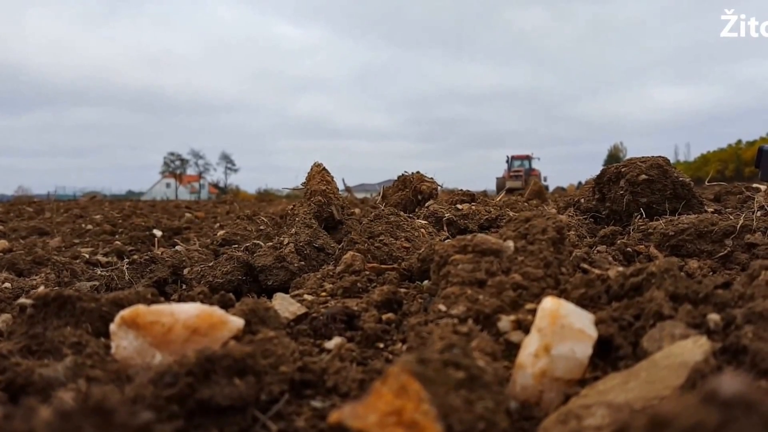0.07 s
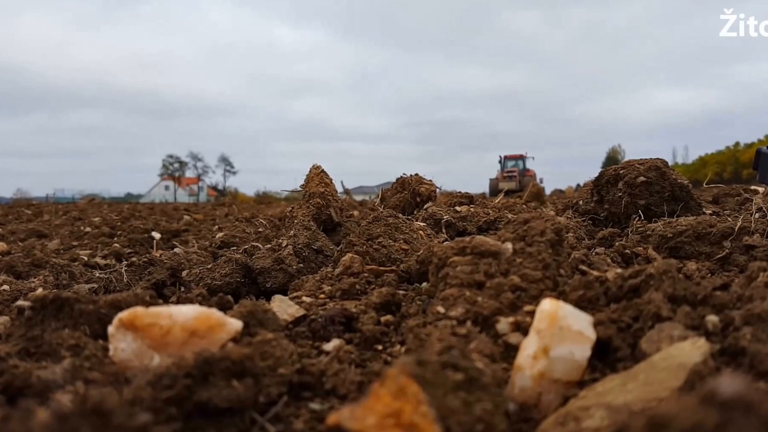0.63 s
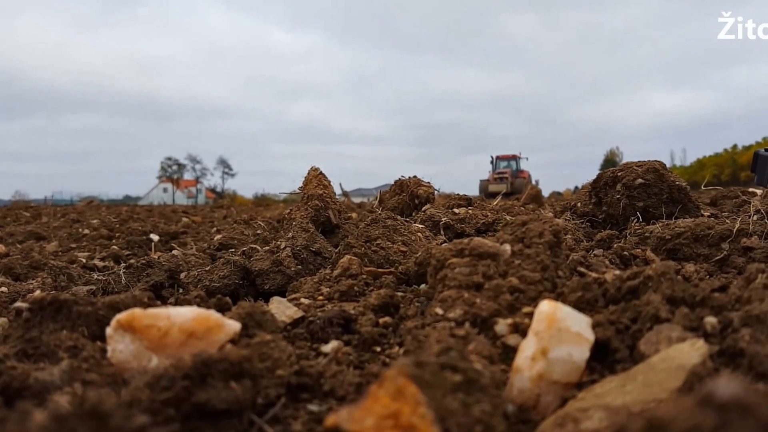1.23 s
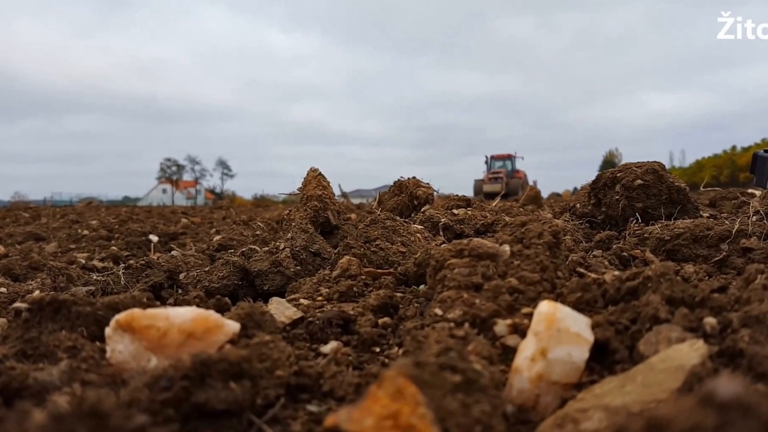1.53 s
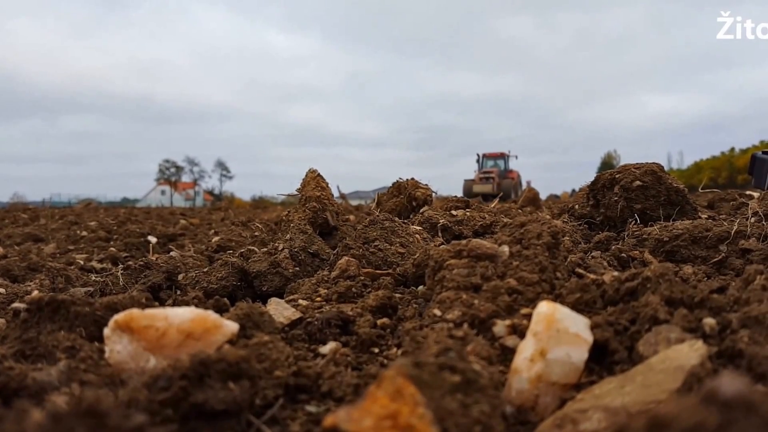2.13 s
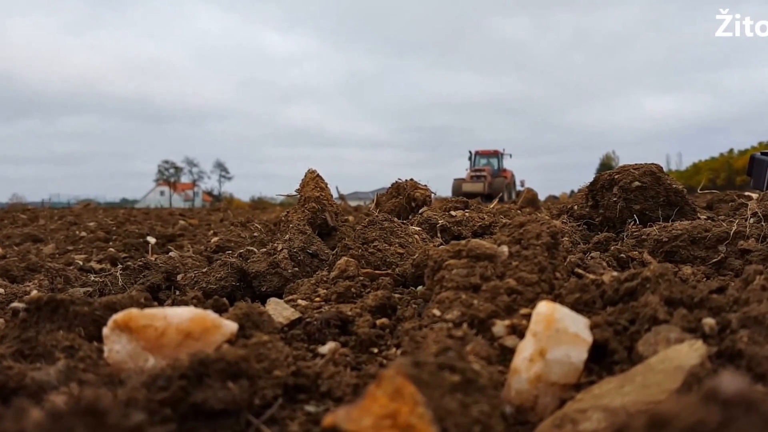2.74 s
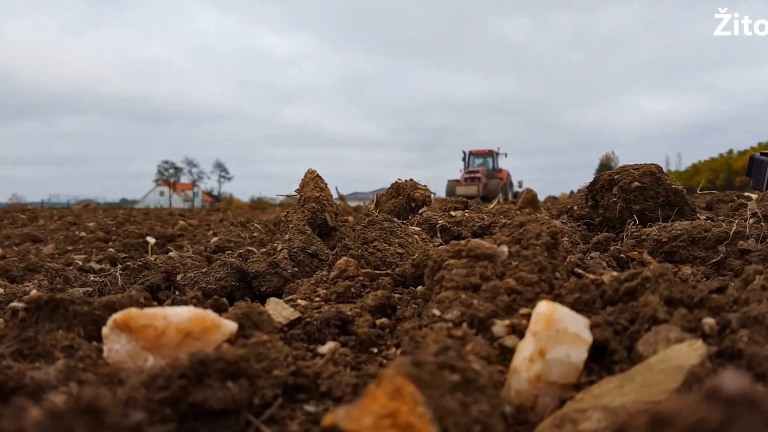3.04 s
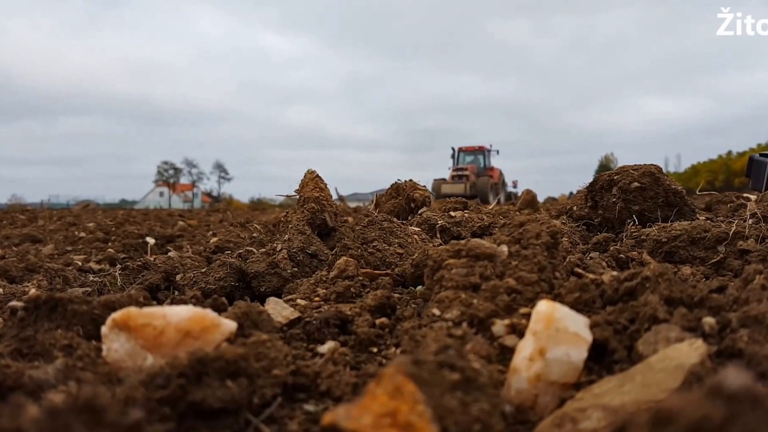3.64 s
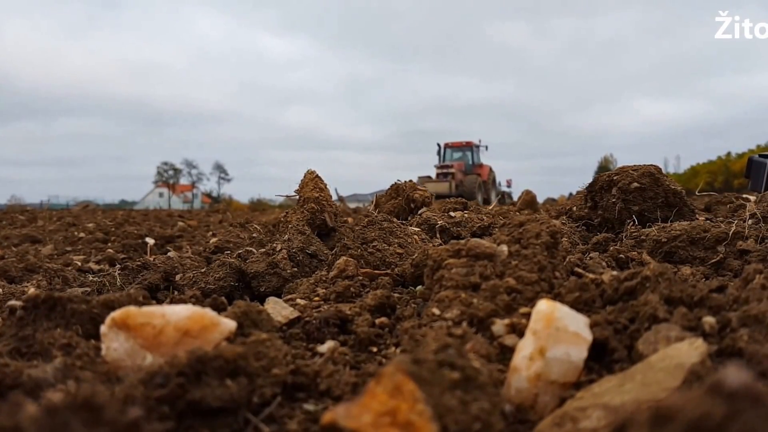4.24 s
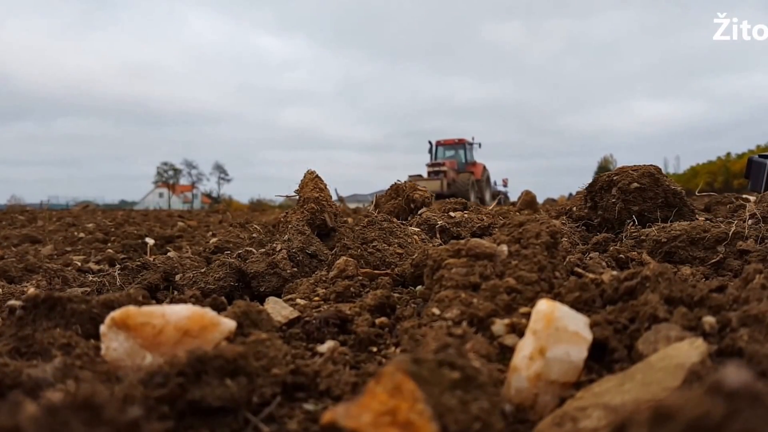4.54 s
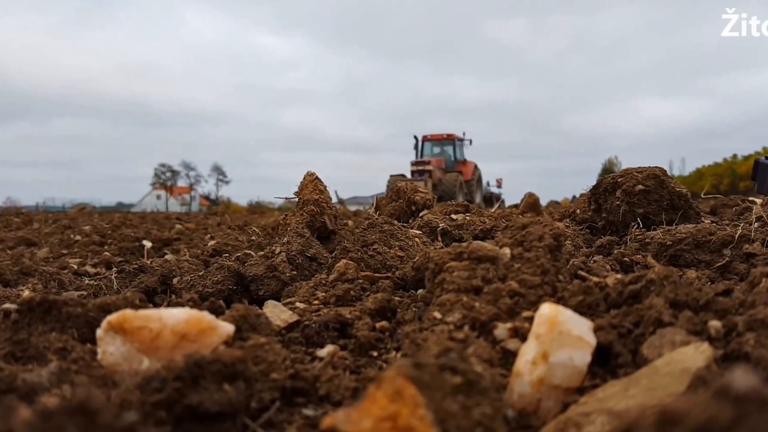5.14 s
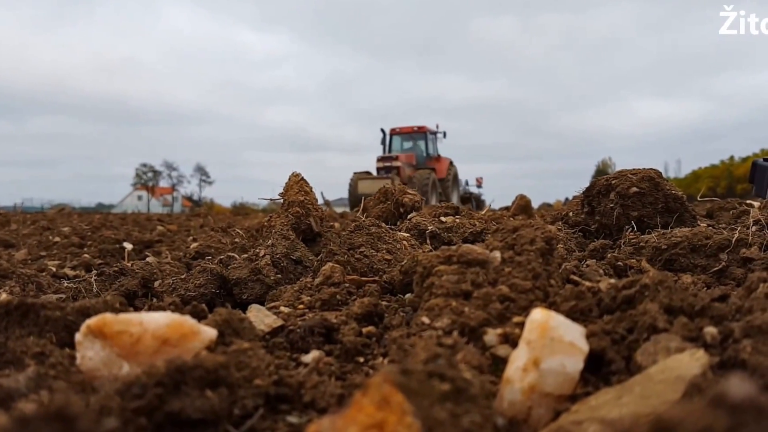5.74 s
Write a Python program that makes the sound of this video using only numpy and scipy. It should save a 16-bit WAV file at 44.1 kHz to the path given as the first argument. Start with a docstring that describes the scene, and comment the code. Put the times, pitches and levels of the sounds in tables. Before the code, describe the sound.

A diesel tractor drags a disc harrow toward a microphone lying in an open field. From the start the exhaust drones low and the engine knocks, its pitch sagging slightly again and again under load. Beneath it, steel discs rattle, ring and hiss through soil, and a faint whine fades away. Around 1.6 seconds gravel ticks, and a few stones click until about 2.1 seconds. From 2.2 to 4.7 seconds the discs give faint, brief, high squeaks. Between 2.6 and 5.6 seconds the sound turns thin and hollow in spells, the longest from about 3.7 to 4.5 seconds. Wind gusts rumble on the microphone from about 1 second on, growing stronger. The tractor gets steadily louder throughout, and by 6 seconds it is near and growling, with hard wind buffeting.

```python
"""A six-cylinder diesel tractor drags a disc harrow toward a phone lying on a field. From the start the
exhaust drones, the block knocks every cycle, the speed sags with the load and steel discs ring and rush
through soil; a faint whine fades. Around 1.6 s gravel ticks and stones begin to click; from 2.2 to 4.7 s
the discs squeak. From 2.6 to 5.6 s the sound turns thin and hollow in spells. By the end the engine is
near and growling, and gusts buffet the microphone harder."""
import sys
import numpy as np
from scipy import signal
from scipy.fft import rfft, irfft
from scipy.io import wavfile
from scipy.ndimage import uniform_filter1d, map_coordinates

SR = 44100
rng = np.random.default_rng(int(sys.argv[2]) if len(sys.argv) > 2 else 0)


def unload_wav(signal):
    """Save mono or channel-first audio to the path in sys.argv[1] as 16-bit WAV at rate SR, clipped to [-1, 1]."""
    wavfile.write(
        sys.argv[1],
        SR,
        np.round(np.clip(np.atleast_2d(signal).T, -1, 1) * 32767).astype(np.int16),
    )


N = 259749
T = np.arange(N) / SR
BINS_HZ = np.maximum(np.fft.rfftfreq(N, 1 / SR), 1)


def undb(db):
    """Decibels to gain."""
    return 10 ** (np.asarray(db) / 20)


def unit(x):
    """Scale to rms 1."""
    return x / np.sqrt(np.mean(x ** 2))


def colour(points):
    """Gain per bin from (frequency [Hz], level [dB]); -48 dB/octave beyond the ends."""
    hz, db = np.transpose(points)
    outside_oct = np.abs(np.log2(BINS_HZ / np.clip(BINS_HZ, hz[0], hz[-1])))
    return undb(np.interp(np.log(BINS_HZ), np.log(hz), db) - 48 * outside_oct)


def bell(hz, sigma_oct):
    """Gain per bin of a resonance, Gaussian in log frequency."""
    return np.exp(-.5 * (np.log2(BINS_HZ / hz) / sigma_oct) ** 2)


def shape(x, gain):
    """Filter by a gain per bin."""
    return irfft(rfft(x) * gain, N)


def noise(gain):
    """Filtered noise, rms 1."""
    return unit(shape(rng.standard_normal(N), gain))


def walk(rate_hz):
    """Smooth random drift, rms 1."""
    return noise(np.exp(-(BINS_HZ / rate_hz) ** 2))


def swell(middle_s, length_s):
    """Raised cosine, 0 to 1 and back."""
    return np.cos(np.pi * np.clip((T - middle_s) / length_s, -.5, .5)) ** 2


def pan(db):
    """Stereo gains for a left-minus-right level."""
    return undb(np.array([[db], [-db]]) / 2)


def exhaust(cycle, load_db, octave_db=-12, scatter_db=2.5, slip_turns=.012):
    """Steady firing note; uneven combustion makes weaker lines waver; load lifts the upper ones."""
    # unequal cylinders give sixths: (multiple of firing rate, level re firing note [dB])
    lines = [(.5, -30), (.667, -37.5), (.833, -31), (1.167, -35), (1.333, -17.5), (1.5, -22.5),
             (1.667, -26.5), (1.833, -37), (2.167, -26.5), (2.333, -32.5), (2.5, -24.5), (3, -29.5),
             (3.5, -35), (4, -34), (5, -32), (6.333, -37), (6.5, -35.5), (9, -38.5)]
    firing_rad = 2 * np.pi * 6 * cycle
    out = undb(.4 * walk(32)) * np.cos(firing_rad)
    out += undb(octave_db + load_db + 1.92 * walk(6.6)) * np.cos(2 * firing_rad)
    for multiple, db in lines:
        gain = undb(db + .5 * load_db * (multiple > 2) + scatter_db * walk(12))
        phase_turns = round(multiple * 6) * cycle + rng.random() + slip_turns * multiple * walk(11.3)
        out += gain * np.cos(2 * np.pi * phase_turns)
    return -np.sqrt(2) * out


def pipe(hz=489.3, wander=.0121):
    """Rushing gas sounds an exhaust pipe resonance, wavering in pitch and level."""
    tone = noise(bell(hz, .054))
    read_index = np.cumsum(1 + wander * walk(4.9))
    return map_coordinates(tone, [read_index], order=1, mode="mirror") * undb(walk(5))


def knocking(cycle, repeat_share):
    """Block noise, partly repeating each cycle, swelling at knocks of uneven force."""
    # knocks in one cycle: (position [cycles], sigma [cycles], centre [Hz], gain)
    knocks = [(.2, 0.075, 472, 0.32), (.36, 0.015, 906, 0.25), (0.531, 0.006, 813, 0.16),
              (.71, 0.043, 475, 0.5), (.86, 0.015, 870, 0.57), (.43, 0.02, 2740, 0.35),
              (0.721, 0.0094, 2150, 0.83)]
    position = cycle % 1
    cycle_samples = int(N / cycle[-1])
    pattern = unit(irfft(np.exp(2j * np.pi * rng.random(cycle_samples // 2 + 1))))
    repeating = np.interp(position, np.linspace(0, 1, len(pattern)), pattern)
    drive = np.sqrt(repeat_share) * repeating + np.sqrt(1 - repeat_share) * rng.standard_normal(N)
    out = drive.copy()
    for at, sigma, hz, gain in knocks:
        blow = np.exp(-.5 * ((position - at) / sigma) ** 2) * (1 + .5 * walk(22))
        out += gain * shape(drive * blow, bell(hz, .23))
    return out


def clatter(block, cycle, crank_depth=.17, firing_depth=.2):
    """Block noise throbs with each crank turn and each firing."""
    # block spectrum: (frequency [Hz], level [dB])
    spectrum = [(220, -3), (260, -4), (335, -5.5), (415, -8), (476, -9.5), (548, -7), (620, -5.5),
                (700, -11), (850, -8), (920, -11.5), (1070, -9), (1250, -22.5), (1350, -18), (1480, -41)]
    crank = crank_depth * np.cos(4 * np.pi * (cycle - .3))
    firing = firing_depth * np.cos(12 * np.pi * (cycle - .041))
    return unit(shape(block, colour(spectrum))) * unit(1 + crank + firing)


def growls(block):
    """Single resonances of the knocking stand out briefly."""
    # growls: (middle [s], length [s], centre [Hz], sigma [oct], level [dB])
    resonances = [(0.098, 0.98, 850, .12, -56.5), (1.95, .7, 490, .04, -47.5),
                  (2.75, 1.89, 1017, 0.23, -54), (4.984, 0.47, 842, 0.09, -44.5),
                  (5.413, 0.3, 454, 0.06, -44.5), (5.777, 0.5, 854, 0.071, -43),
                  (5.817, 0.29, 232, 0.27, -34.5)]
    return sum(unit(shape(block, bell(hz, sigma_oct))) * undb(db) * swell(middle_s, length_s)
               for middle_s, length_s, hz, sigma_oct, db in resonances)


def crumbs(rate_hz, spread_db):
    """Random impacts of soil crumbs; spread makes a few much larger."""
    hits = (rng.random(N) < rate_hz / SR) * rng.choice([-1, 1], N)
    return unit(hits * undb(spread_db * np.minimum(rng.exponential(size=N), 3.5)))


def frame_modes():
    """Gain per bin of the steel frame's fine, close modes, within 2 dB."""
    ripple = uniform_filter1d(uniform_filter1d(rng.standard_normal(len(BINS_HZ)), 170), 170)
    return undb(np.clip(unit(ripple), -2, 2))


def steel_ring(drive, boost_db=1.5, waver_db=1.83):
    """Drive plus the disc and frame resonances it excites, which come, glide and go."""
    # modes: (centre [Hz], width [Hz], relative gain [dB], at time [s], fade either side [dB/s],
    # glide [Hz/s])
    modes = [(1637, 68, 9.5, 3, 2.5, 4.5), (1836, 82, -1.5, 6.2, 5.5, 0.5), (2133, 230, 5, 3, 3, 3.5),
             (2385, 170, 10, 3.14, 3.5, 16), (2657, 120, 6.5, 5.7, 11, -1.5), (2906, 250, 3, 2.2, 2, 11),
             (3060, 170, 5, 7.9, 7.5, -1), (3512, 180, 7, 4.2, 1.4, 16), (3830, 140, -3, 3.3, 0, 2.5),
             (4380, 140, -1, 2, -0.5, 1), (4660, 190, 6, 0.43, 2.5, -6.5), (5080, 250, 6.5, 5.6, 6, 1),
             (5450, 200, 0.5, 2, -0.5, -1.5), (5900, 270, -1, 5.1, 2, 1.5), (6300, 150, 1.5, 1.5, 2, -1),
             (6860, 260, -4, 3.5, 0.5, 1), (7700, 240, -2, 4.3, 10.5, 1), (10800, 120, 5, 3.4, 8, 0)]
    out, spectrum, progress = drive.copy(), rfft(drive), T / T[-1]
    for hz, width_hz, db, at_s, fade_db_s, glide_hz_s in modes:
        # glide: crossfade from the start tuning to the end tuning
        early, late = (irfft(spectrum * .5 ** ((2 * (BINS_HZ - hz - glide_hz_s * s) / width_hz) ** 2), N)
                       for s in (-T.mean(), T.mean()))
        ring = early + progress * (late - early)
        out += ring * undb(db + boost_db - fade_db_s * np.abs(T - at_s) + waver_db * walk(4.2))
    return out


def harrow(cycle, rattle_db, hiss_db):
    """Crumbs and engine shake rattle the frame, soil hisses over the discs; both ring the steel."""
    # frame rattle and soil hiss spectra: (frequency [Hz], level [dB])
    rattle_spectrum = [(1400, -6.5), (1900, -1.5), (2700, -4.5), (3200, -5), (4100, -11), (5000, -12.5),
                       (6000, -18)]
    soil_spectrum = [(2500, -9.5), (4000, -8), (6000, -3), (6550, -5), (7300, -0.5), (8100, -3.5),
                     (9300, 0), (10300, -6.5), (11800, -11), (12900, -12), (15500, -21)]
    # stonier ground: (middle [s], length [s], rattle rise [dB], hiss rise [dB])
    scrapes = [(0.235, 1, 4, 2), (1.617, 0.6, 3.5, 3), (2.063, 0.83, 1, -0.5), (2.504, 0.041, 2, 4.5),
               (2.683, 0.82, 3.5, 2.5), (3.265, 0.86, 2, 1.5), (4.82, 0.25, -1.5, 2)]
    for middle_s, length_s, rattle_rise_db, hiss_rise_db in scrapes:
        rattle_db = rattle_db + rattle_rise_db * swell(middle_s, length_s)
        hiss_db = hiss_db + hiss_rise_db * swell(middle_s, length_s)
    modes = frame_modes()
    shake = knocking(cycle, repeat_share=.18) + .35 * crumbs(rate_hz=1200, spread_db=1)
    soil = rng.standard_normal(N) + .36 * crumbs(rate_hz=2700, spread_db=9.5)
    rattle = unit(shape(shake, colour(rattle_spectrum) * modes)) * undb(rattle_db)
    hiss = unit(shape(soil, colour(soil_spectrum) * modes)) * undb(hiss_db + walk(32))
    return steel_ring(rattle + hiss)


def stones(crack_s=.00076, attack_s=.00036):
    """Each stone gives a bright crack and a short, dry ring."""
    # strikes: (time [s], ring gain [dB], ring pitch [Hz], ring decay [s], crack level [dB])
    strikes = [(1.624, -31.5, 2590, .0009, -59), (1.766, -17.5, 2010, 0.00069, -59),
               (1.769, -27, 2540, 0.00047, -60), (1.996, -48, 3530, 0.00088, -49),
               (2.114, -24, 1180, 0.0014, -61.5), (2.119, -21.5, 1970, 0.00055, -39),
               (3.89, -49, 3560, 0.00082, -49)]
    out, bright = np.zeros(N), noise(bell(3900, .8))
    for start_s, ring_db, hz, decay_s, crack_db in strikes:
        age_s = np.maximum(T - start_s, 0)
        ring = np.sin(2 * np.pi * hz * age_s) * (1 - np.exp(-age_s / attack_s)) * np.exp(-age_s / decay_s)
        crack = bright * (T >= start_s) * np.exp(-age_s / crack_s)
        out += undb(ring_db) * ring + undb(crack_db) * crack
    return out


def gravel(level_db=-58.5):
    """Small stones tick on the discs in one quick, uneven run."""
    ticks = unit(shape(crumbs(rate_hz=110, spread_db=0), bell(2750, .3)))
    return ticks * undb(level_db) * swell(middle_s=1.59, length_s=.52)


def squeaks(scratch_depth=.5):
    """Steel rubs on steel: scratchy tones that catch fast and trail off."""
    # rubs: (start [s], length [s], pitch [Hz], level [dB], left minus right [dB], pitch jitter [ratio])
    rubs = [(2.24, .04, 5420, -62, -2, .012), (2.485, 0.03, 4430, -56, 0, 0.018),
            (2.48, 0.034, 9500, -59, 2, 0.022), (3.068, 0.057, 8910, -59, 11, 0.00401),
            (3.072, 0.053, 10914, -63, -1, .005), (3.09, 0.093, 6232, -62.5, -19, .005),
            (3.15, 0.05, 5420, -61, 4, .015), (3.27, 0.039, 5407, -60, 0, .012),
            (3.512, 0.065, 8880, -61, 4, .01), (3.516, 0.077, 10914, -66, 2, .006),
            (3.724, 0.036, 8970, -64.5, 9, .01), (4.674, 0.036, 8970, -57, 8, .01)]
    out, waver = np.zeros((2, N)), walk(490)
    grip = unit(1 + scratch_depth * walk(120))
    for start_s, length_s, hz, db, pan_db, jitter in rubs:
        envelope = np.sin(np.pi * np.sqrt(np.clip((T - start_s) / length_s, 0, 1)))
        tone = np.sqrt(2) * np.sin(2 * np.pi * hz * np.cumsum(1 + jitter * waver) / SR)
        out += tone * envelope * grip * undb(db) * pan(pan_db)
    return out


def wind(start_db=-49, rise_db_s=3, buffet_db=3):
    """A freshening, gusty breeze; eddies hit each microphone port separately."""
    # eddy spectrum: (frequency [Hz], level [dB])
    spectrum = [(15, -13.5), (35, -7), (65, 0), (120, 5), (200, -11), (330, -18.5), (600, -26), (1500, -47)]
    # gusts: (middle [s], length [s], rise [dB])
    gusts = [(1.148, 0.15, 10), (1.442, 0.33, 5), (1.797, 0.2, 9), (2.13, 0.36, -1), (2.54, 0.44, 12),
             (3.371, 0.39, 7.5), (3.77, 0.32, 13), (4.396, 1, 5.5), (4.639, 0.12, 5), (5.015, 0.26, 5),
             (5.33, 0.21, 6), (5.869, 0.33, 7)]
    gust_db = sum(db * swell(middle_s, length_s) for middle_s, length_s, db in gusts)
    ports = np.array([noise(colour(spectrum)) * undb(buffet_db * walk(6.7)) for _ in range(2)])
    return ports * undb(start_db + rise_db_s * T + gust_db) * pan(5)


def rumble():
    """Low machine noise, common to both ports."""
    return noise(bell(115, 1.56))


def whine(peak_db=-57.5, peak_s=.35, fade_db_s=6.5):
    """Narrow, airy tone that fades as the tractor nears."""
    return noise(bell(1835, .05)) * undb(peak_db - fade_db_s * np.abs(T - peak_s))


def hush(level_db=-49.5):
    """Steady, far-off noise of the open field."""
    return noise(bell(1048, .24)) * undb(level_db)


def spread(x, diffuse_hz=1800, direct_floor=.3, step_rad2=.0631):
    """Stereo side signal: a quarter-turn of phase if direct, random for treble scattered by clods."""
    # image width: (frequency [Hz], side minus mid [dB])
    width = [(60, -3.5), (200, -45), (380, -18.5), (600, -7.5), (760, 6.5), (860, -13.5), (1000, -14),
             (1250, -1), (1700, 7), (2400, 1.5), (3100, 1), (4400, -1.5), (9000, -0.5), (15000, 0)]
    # image lean: (frequency [Hz], left minus right [dB])
    lean = [(250, -3), (500, -0.5), (1000, 2), (2000, -0.1), (4000, -1.5), (8000, 0.7)]
    direct = direct_floor + (1 - direct_floor) / (1 + (BINS_HZ / diffuse_hz) ** 2)
    scattered = np.exp(1j * np.cumsum(rng.normal(0, np.sqrt(step_rad2), len(BINS_HZ))))
    side = shape(x, colour(width) * (1j * direct + np.sqrt(1 - direct ** 2) * scattered))
    hz, db = np.transpose(lean)
    left_gain = undb(np.interp(np.log(BINS_HZ), np.log(hz), db) / 2)
    return np.array([shape(x + side, left_gain), shape(x - side, 1 / left_gain)])


def scene(start_m=25.87, speed_m_s=2.813, unloaded_hz=99.73, slowing_hz_s=.472):
    """The rig grows louder as it nears; biting discs drag the engine down and harden its exhaust."""
    # disc bites: (middle [s], length [s], firing rate sag [Hz], rise of the exhaust's octave [dB])
    bites = [(0.07, 0.59, 3.77, 1.5), (0.424, 0.68, 3.47, 1.5), (0.89, 0.7, 2.5, 1.5),
             (1.361, 0.51, 2.97, 3), (1.815, 0.5, 1.316, 1.5), (2.105, 0.47, 2.25, 4),
             (2.589, 0.47, 4.32, 7), (3.214, 0.84, 4.0, 6), (3.79, 0.68, 5.4, 6), (4.325, 0.93, 3.97, -1),
             (4.877, 0.48, 4.6, 5.5), (5.368, 0.52, 3.69, 2.5), (5.798, 0.65, 3.8, 1.5)]
    sag_hz = sum(hz * swell(middle_s, length_s) for middle_s, length_s, hz, _ in bites)
    load_db = sum(db * swell(middle_s, length_s) for middle_s, length_s, _, db in bites)
    cycle = np.cumsum(unloaded_hz - slowing_hz_s * T - sag_hz) / SR / 6  # six firings per cycle
    travel_m = speed_m_s * T
    near_db = -20 * np.log10(1 - travel_m / start_m)
    unshield_db = .2165 * travel_m  # clods shield the hiss less with every metre
    block = knocking(cycle, repeat_share=.7)
    drone = exhaust(cycle, load_db) * undb(-22 + near_db) * pan(.06)
    ahead = clatter(block, cycle) * undb(-43 + near_db) + growls(block) + whine()
    ahead += harrow(cycle, rattle_db=-62.5 + near_db, hiss_db=-68 + near_db + unshield_db)
    ahead += stones() + hush()
    ahead += pipe() * undb(-48 + near_db + .37 * load_db) + gravel()
    return drone + spread(ahead) + squeaks() + wind() + rumble() * undb(-43 + near_db)


def record(dry, bass_hz=185, fall_s=.09, return_s=.06, top_hz=15600):
    """At times the bass thins and the middle turns hollow and dull; the top is cut."""
    # thin spells: (start [s], length [s], full dip [dB])
    spells = [(2.575, 0.11, 6), (3.42, 0.24, 10), (3.744, 0.79, 13), (4.98, 0.035, 3), (5.325, 0.025, 4),
              (5.39, 0.16, 7), (5.576, 0.059, 8)]
    # hollow bands: (centre [Hz], sigma [oct], share of the dip)
    hollows = [(303, 0.21, 0.53), (774, 0.12, 0.93), (1740, 0.49, 0.53)]
    dip_db = np.zeros(N)
    for start_s, length_s, db in spells:
        ramp = np.minimum((T - start_s) / fall_s, (start_s + length_s - T) / return_s)
        dip_db += db * np.clip(.5 + ramp, 0, 1)
    kept = 1 - 1 / (1 + (BINS_HZ / bass_hz) ** 5)
    for hz, sigma_oct, share in hollows:
        kept *= 1 - share * bell(hz, sigma_oct)
    thinned = dry - (1 - undb(-dip_db)) * shape(dry, 1 - kept)
    edge_fade = np.clip(np.minimum(T, T[-1] - T) / .004, 0, 1)
    lowpass = signal.ellip(8, .2, 70, top_hz, fs=SR, output="sos")
    return signal.sosfilt(lowpass, thinned * edge_fade)


dry = scene()
out = record(dry)
unload_wav(out)
```